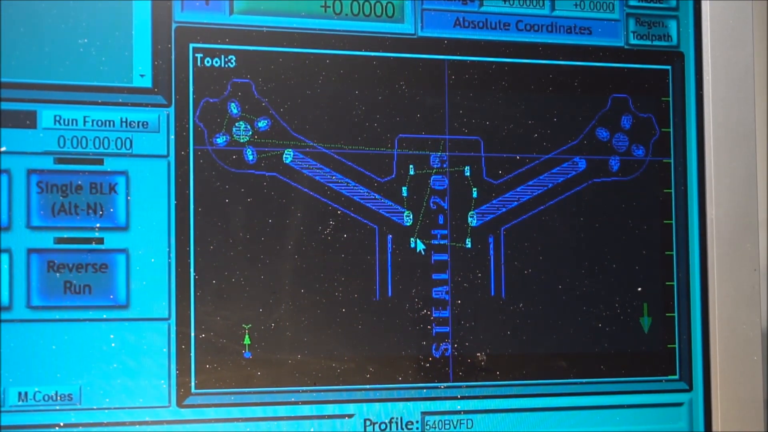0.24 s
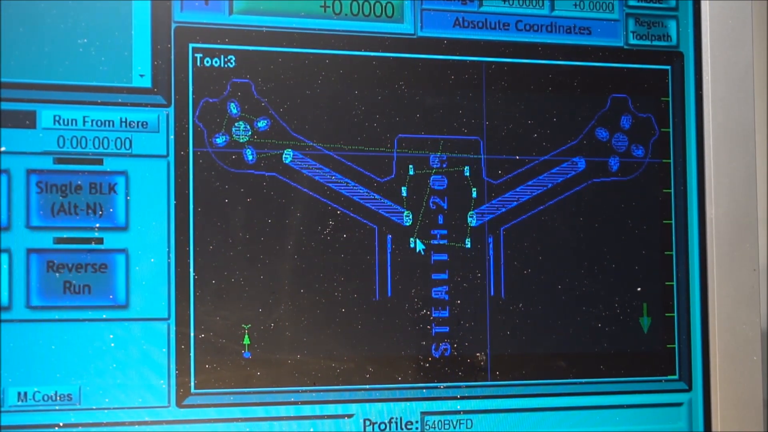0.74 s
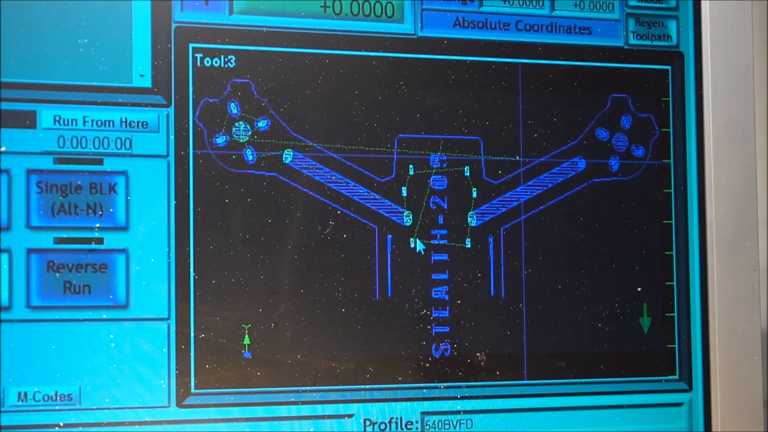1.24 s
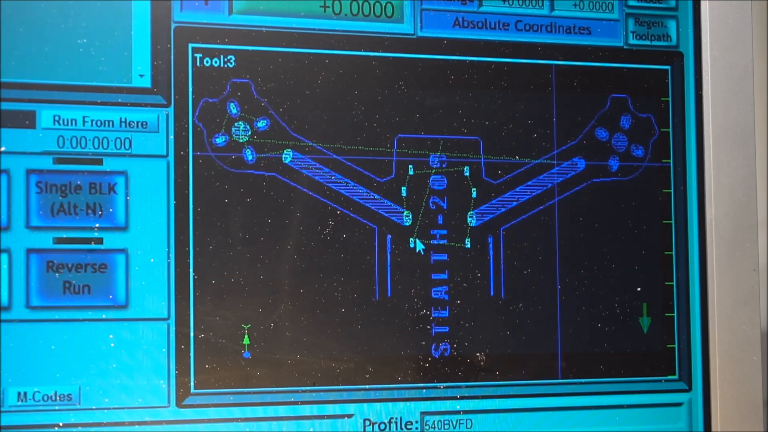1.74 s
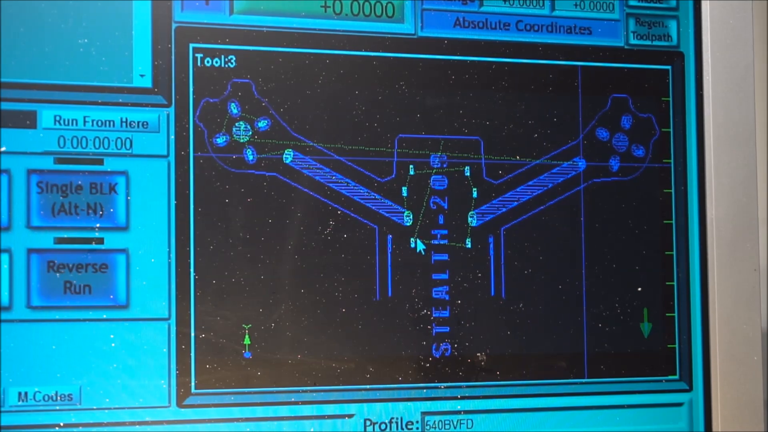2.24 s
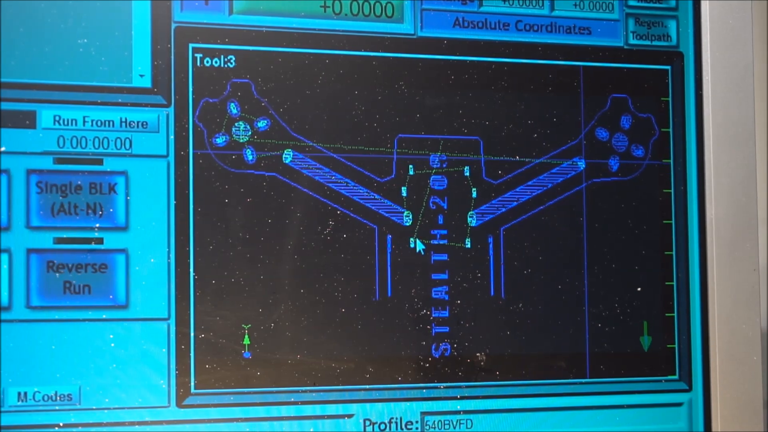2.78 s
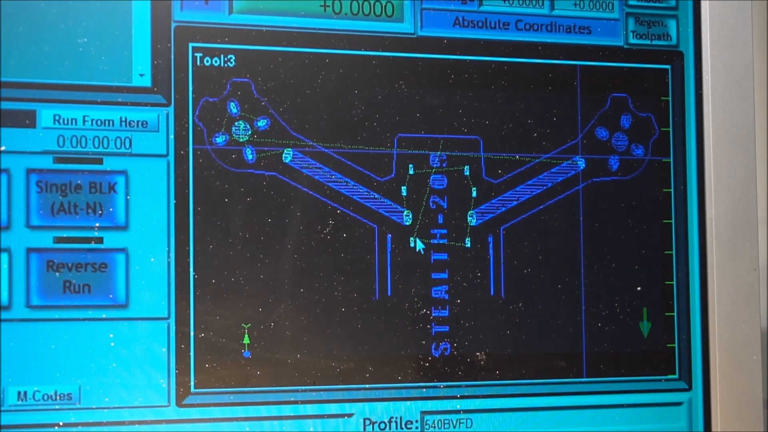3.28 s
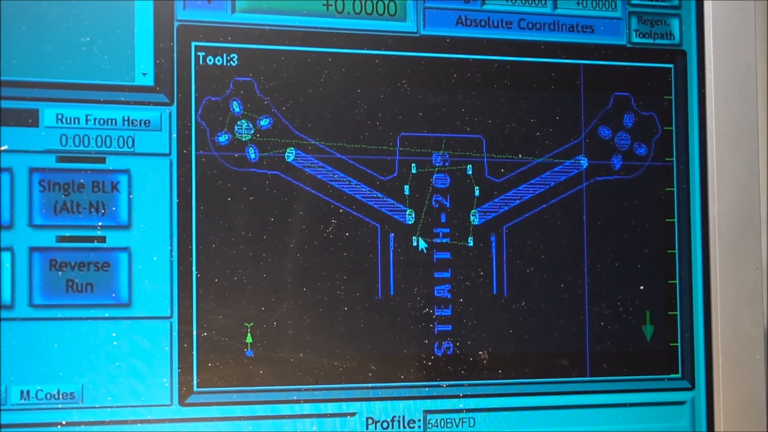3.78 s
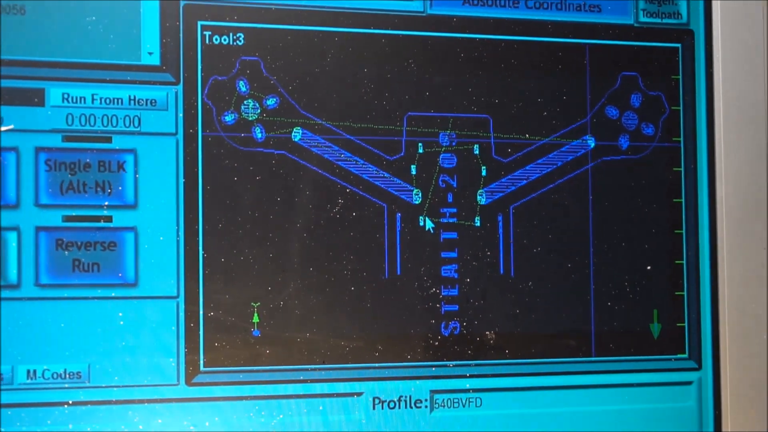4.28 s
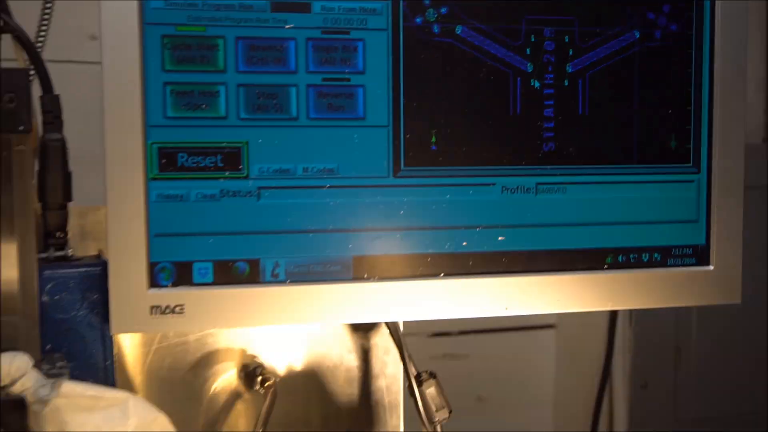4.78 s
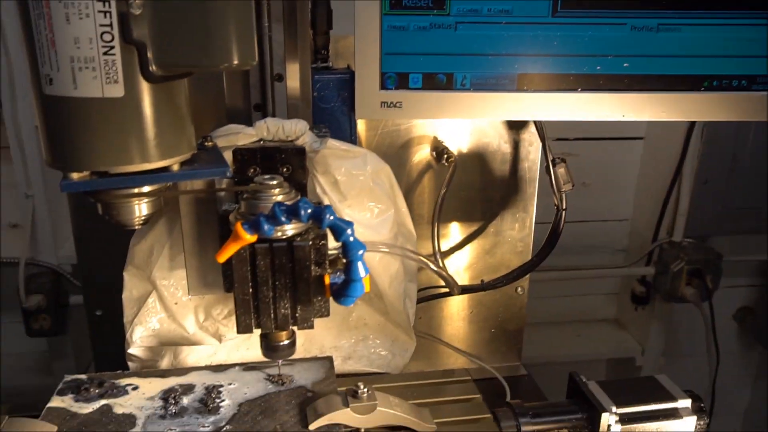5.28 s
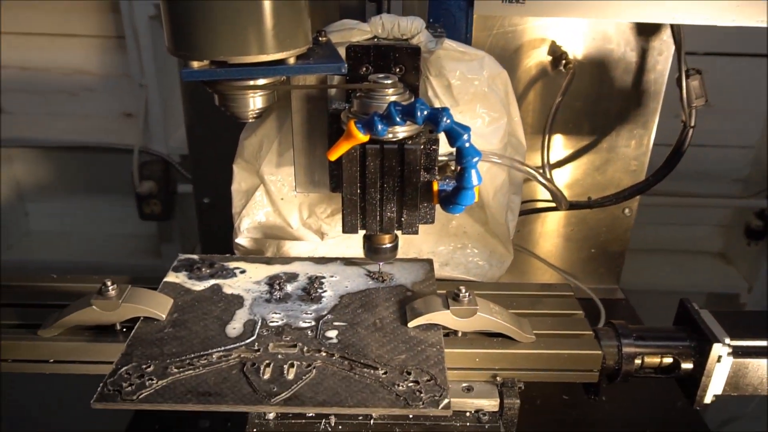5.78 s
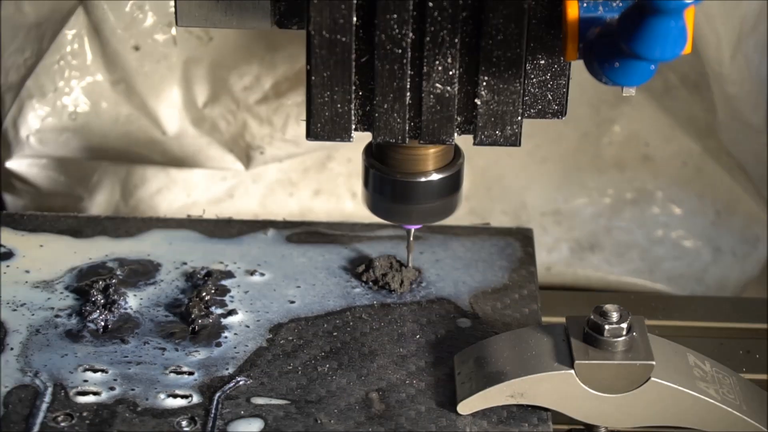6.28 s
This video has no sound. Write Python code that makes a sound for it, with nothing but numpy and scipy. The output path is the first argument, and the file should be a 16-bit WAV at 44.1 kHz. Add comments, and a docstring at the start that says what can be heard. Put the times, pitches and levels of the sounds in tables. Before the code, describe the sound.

A close handheld microphone hears a small mill running indoors: constant layered electric whine, a rush of air, and motor tones that change with the table's movement. Six dull handling thumps lead to five hard clacks. Then the cutter shrieks and chatters in two bursts of a little over half a second, with gritty scrapes and tiny high squeaks between. After a steady whining gap, a third bite starts with a shrill squeal and the sound ends sharply.

```python
"""At a small CNC mill: the spindle whines at about 237 turns a second, as steady lines over a noise of air and bearings.
The stepper motors sing, as other sets of lines, while the table feeds fast, then slowly.
The router bit bites three times into a carbon fibre plate: chatter is a harmonic series, squeals are short tones,
grit is grainy noise through the plate's resonances.
Close by, shaped noise bursts make six soft thumps and five sharp clacks, as of hands at the computer controls."""
import sys
import numpy as np
from scipy.fft import rfft, irfft, next_fast_len
from scipy.io import wavfile
from scipy.ndimage import uniform_filter1d, map_coordinates

SR = 44100
rng = np.random.default_rng(int(sys.argv[2]) if len(sys.argv) > 2 else 0)


def persist_wave(psi):
    """Save psi, clipped to +-1, as 16-bit WAV."""
    counts = np.round(np.clip(psi, -1, 1) * 32767).astype(np.int16)
    wavfile.write(sys.argv[1], SR, np.atleast_2d(counts).T)


N = 287958
TIME = np.arange(N) / SR
TURN_HZ = 237.4

# bites of the bit into the plate: start_s, end_s, rattle_delay_s, plate_chatter_db, bit_scream_db
BITES = [(2.339, 2.964, .14, -25.5, -22.5), (4.001, 4.635, 0.095, -22, -23),
         (5.882, 6.053, .01, -29.5, -19)]
BITE_S, RELEASE_S = 0.015, 0.027  # ramps as the bit enters and leaves the plate


def amp(db):
    """Decibels to gain."""
    return np.exp(np.asarray(db) * (np.log(10) / 20))


def unit(x):
    """Scale to rms 1."""
    return x / np.sqrt(np.mean(np.abs(x) ** 2) + 1e-20)


def along(points, hz):
    """Interpolate (Hz, value) points on a log frequency axis."""
    point_hz, values = np.transpose(points)
    return np.interp(np.log(hz + 1), np.log(point_hz + 1), values)


def wobble(knots_per_s):
    """Smooth random curve through normal knots."""
    knots = rng.standard_normal(int(N * knots_per_s / SR) + 4)
    coarse_s = TIME[::32]
    return np.interp(TIME, coarse_s, map_coordinates(knots, [coarse_s * knots_per_s]))


def filtered(x, response):
    """Apply a zero-phase response, a function of Hz, by FFT."""
    size = next_fast_len(N + SR // 4, True)
    spectrum = rfft(x, size) * response(np.fft.rfftfreq(size, 1 / SR))
    return irfft(spectrum, size)[..., :N]


def colour(points):
    """Response that follows (Hz, dB) points."""
    return lambda f: amp(along(points, f))


def body(modes):
    """Magnitude response of (Hz, width Hz, dB) resonances, summed in power."""
    def response(f):
        power = 0
        for mode_hz, width_hz, db in modes:
            damping = (f * width_hz) ** 2
            power = power + amp(db) ** 2 * damping / ((mode_hz ** 2 - f * f) ** 2 + damping + 1e-9)
        return np.sqrt(power)
    return response


def spread(hz):
    """Half the angle between the two sides: small in the bass, wide in the diffuse treble."""
    # left-right likeness: freq_hz, correlation
    likeness = [(1200, 1), (2500, 1), (5000, 0.66), (9000, 0.43), (14000, 0.18)]
    return np.arccos(np.clip(along(likeness, hz), -1, .999)) / 2


def noise(response):
    """Stereo noise of rms 1: alike in the bass, diffuse in the treble."""
    def mid_side(f):
        angle = spread(f)
        return response(f) * np.array([np.cos(angle), np.sin(angle)])
    mid, side = filtered(rng.standard_normal((2, N)), mid_side)
    return unit(np.array([mid + side, mid - side]))


def tone(hz, clock):
    """Stereo sine of rms 1; reflections put the sides out of step, more so in the treble."""
    lead = spread(hz) * rng.choice([-1, 1])
    phase = (2 * np.pi * ((hz * clock + rng.random()) % 1)).astype(np.float32)
    return np.sqrt(2) * np.sin(phase + np.float32([[lead], [-lead]]))


def swell(centre_s, half_width_s):
    """Gaussian bump, down to exp(-2) at the half width."""
    return np.exp(-2 * np.minimum(((TIME - centre_s) / half_width_s) ** 2, 20))


def held(start_s, end_s, attack_s, release_s):
    """Attack, hold and release, the ramps centred on start and end."""
    ramps = np.minimum((TIME - start_s) / attack_s, (end_s - TIME) / release_s)
    return np.clip(ramps + .5, 0, 1)


def grit(depth, grain_db):
    """Envelope of fine grains: a surge on each spindle turn, in grains of random size."""
    surge = 1 + depth * np.cos(2 * np.pi * TURN_HZ * TIME)
    return unit(surge * amp(grain_db * wobble(700)))


def whine(lines, drift, waver_db, flutter_db):
    """Lines on one slightly unsteady shaft; each wavers by itself, the short waves more."""
    clock = TIME + np.cumsum(drift * wobble(9)) / SR
    out = 0
    for hz, db in lines:
        sway_db = (hz / 1000) ** 0.38 * (waver_db * wobble(3.3) + flutter_db * wobble(24))
        out = out + amp(db + sway_db) * tone(hz, clock)
    return out


def spindle():
    """Steady lines of the spindle, bearings and drive, plus a whistling twelfth order."""
    # freq_hz, relative_db
    spindle_lines = [(234.2, -49.9), (480.1, -33.2), (542.6, -40.6), (722.0, -41.5), (751.0, -40.5),
                     (812.9, -44.6), (960.2, -30.8), (1084.7, -47.0), (1232.8, -40.1), (1440.0, -38.6),
                     (1687.7, -42.4), (2034.9, -47.5), (2172.2, -45.5), (2401.0, -50.4), (2893.5, -48.7),
                     (3329.6, -45.5), (3391.5, -47.2), (3601.4, -48.3), (3644.5, -47.6), (3663.3, -49.8),
                     (3797.9, -47.8), (3841.0, -45.8), (4069.8, -48.7), (4303.9, -50.6), (5698.2, -49.3),
                     (6648.4, -50.9), (7127.5, -51.5), (7609.3, -50.2), (7883.8, -51.0), (8422.2, -51.4),
                     (11967.1, -53.9), (12335.8, -54.8), (14093.5, -53.7)]
    lines = amp(-1) * whine(spindle_lines, drift=.0003, waver_db=1.2, flutter_db=1.48)
    whistle_db, late_whistle_db = -42, -42.5
    # louder from 4.6 s to 5.75 s
    late = held(4.62, 5.75, attack_s=0.052, release_s=0.052)
    whistle_level = amp(whistle_db) + amp(late_whistle_db) * late
    return lines + whistle_level * amp(0.6 * wobble(18)) * tone(12 * TURN_HZ, TIME)


def steppers():
    """Stepper lines change with the feed; the table rings with the fast feed, more as it eases."""
    # freq_hz, relative_db
    fast_lines = [(285.3, -52.1), (726.7, -32.1), (1048.1, -34.6), (1205.9, -41.3), (1251.6, -47.8),
                  (1453.5, -39.2), (1528.9, -48.4), (1773.8, -38.7), (2578.6, -49.1), (4314.7, -45.8)]
    # freq_hz, relative_db
    slow_lines = [(783.3, -41.5), (1491.2, -46.5), (1569.2, -40.5), (1921.8, -47.5), (3138.5, -48),
                  (6282.3, -57), (7843.5, -54.5), (9401.9, -54.6)]
    # moves on the slow feed: start_s, end_s, gain_db
    slow_moves = [(2.975, 3.46, -1), (4.62, 5.375, -1)]
    ramp_s = 0.052

    fast_db, ease_start_s, fast_stop_s, ease_db_per_s = 0.5, 1.22, 2.13, 6
    easing_s = np.clip(TIME - ease_start_s, 0, 1)
    # on from the outset
    fast_level = amp(fast_db - ease_db_per_s * easing_s) * held(-1, fast_stop_s, ramp_s, ramp_s)
    fast = fast_level * whine(fast_lines, drift=0.00022, waver_db=.5, flutter_db=0.5)

    slow_level = sum(amp(db) * held(start_s, end_s, ramp_s, ramp_s) for start_s, end_s, db in slow_moves)
    slow = slow_level * whine(slow_lines, drift=0.00022, waver_db=2.5, flutter_db=3.5)

    table_hz, ring_db, growth_start_s, growth_db_per_s, ring_stop_s = 2084.4, -38, 1.0, 9.5, 2.1
    growing_s = np.clip(TIME - growth_start_s, 0, 1)
    ring_level = amp(ring_db + growth_db_per_s * growing_s) * held(-1, ring_stop_s, ramp_s, ramp_s)
    ring = ring_level * amp(.7 * wobble(14)) * tone(table_hz, TIME)
    return fast + slow + ring


def bite_levels():
    """Levels of plate and bit: in each bite the bit screams first, then the plate joins in."""
    entry_db, entry_s = 2, 0.036  # the bit screams harder as it enters
    takeover_db, takeover_s = 3, .06  # and gives way as the plate takes up the vibration
    build_s = 0.027
    plate, bit = 0, 0
    for start_s, end_s, delay_s, plate_db, bit_db in BITES:
        rattle_s = start_s + delay_s
        shape_db = entry_db * swell(start_s, entry_s) - takeover_db * swell(rattle_s, takeover_s)
        plate = plate + amp(plate_db) * held(rattle_s, end_s, build_s, RELEASE_S)
        bit = bit + amp(bit_db + shape_db) * held(start_s, end_s, BITE_S, RELEASE_S)
    load = amp(1.2 * wobble(14))  # uneven load
    return plate * load, bit * load


def chatter(drift, jitter, flicker_db, runout):
    """The loaded bit rattles against the plate; low multiples shake the plate, high ones the bit."""
    # multiple of chatter_hz, relative_db
    partials = [(1, 0.5), (2, -2.5), (3, -0.5), (4, -12.5), (5, -5), (6, -2.5), (7, -10.5), (9, -10),
                (11, -2.5), (12, -4), (13, -5), (14, -9.5), (16, -10.5), (17, -21.5), (19, -15.5)]
    # resonances of bit and collet: freq_hz, width_hz, relative_db
    bit_modes = [(2876, 61, -5), (6490, 160, -4.5), (8890, 320, 1), (9110, 340, -9.5), (9570, 260, -6),
                 (11700, 260, -8.5), (12800, 350, -6.5), (13600, 400, -13)]
    chatter_hz = 727.6
    plate_level, bit_level = bite_levels()
    clock = TIME + np.cumsum(drift * wobble(20) + jitter * wobble(350)) / SR
    plate, bit = np.zeros((2, N)), np.zeros((2, N))
    for k, db in partials:
        # the rattle saturates: partials only dip, the lowest least
        level = amp(db - flicker_db * k / (k + 1) * np.abs(wobble(45)))
        # each partial slips in and out of step with the bit
        slip_s = 0.033 * wobble(80) / (np.sqrt(k) * chatter_hz)
        partial = level * tone(k * chatter_hz, clock + slip_s)
        if k < 8:
            plate = plate + partial
        else:
            bit = bit + partial
    # the off-centre bit digs deeper once a turn
    rattle = plate_level * unit(plate) * grit(depth=runout, grain_db=1.8)
    scream = amp(-4.0) * unit(bit) * amp(1.1 * wobble(500))
    dust = amp(-3.5) * noise(body(bit_modes)) * amp(1.9 * wobble(700) + wobble(50))
    return rattle + bit_level * (scream + dust)


def scrapes():
    """Breaking fibres ring the plate in clumps, throughout each bite, as the bit leaves, and apart."""
    # plate resonances before sharpening: freq_hz, width_hz, relative_db
    plate_modes = [(742, 44, 1), (1026, 160, 0.5), (1210, 121, -3), (1480, 110, -5.5), (1700, 92, -25),
                   (2257, 300, 0), (3700, 500, -12)]
    # separate rough scrapes: centre_s, half_width_s, low_modes_db, high_modes_db
    lone_scrapes = [(2.3, 0.078, -32.5, -33.5), (3.51, 0.13, -33, -35), (3.966, 0.11, -32.5, -34.5),
                    (4.12, 0.027, -22.5, -32), (5.359, 0.058, -30.5, -36)]
    split_hz = 1900
    drive = noise(np.ones_like) * grit(depth=.45, grain_db=0.5) * amp(wobble(70))

    def plate(f):
        sharpened = body(plate_modes)(f) ** 1.48
        return sharpened * f ** 4 / (f ** 4 + 600 ** 4)

    low = unit(filtered(drive, lambda f: plate(f) * (f < split_hz)))
    high = unit(filtered(drive, lambda f: plate(f) * (f >= split_hz)))
    cutting = sum(held(start_s, end_s, BITE_S, RELEASE_S) for start_s, end_s, *_ in BITES)
    leaving = sum(swell(end_s, .04) for _, end_s, *_ in BITES)
    out = cutting * (amp(-35.5) * low + amp(-36.5) * high) + amp(-30.5) * leaving * high
    for centre_s, half_width_s, low_db, high_db in lone_scrapes:
        out = out + swell(centre_s, half_width_s) * (amp(low_db) * low + amp(high_db) * high)
    return out


def squeals():
    """The bit rubs the wall of its slot and rings, over a spit of dust."""
    # centre_s, half_width_s, pitch_hz, tone_db, dust_db
    rubs = [(0.967, .02, 2940, -32, -57.5), (1.086, .018, 2920, -31, -52.5),
            (2.387, 0.066, 2920, -32, -48.5), (3.115, 0.017, 7600, -28, -27), (3.203, .025, 7600, -35, -30),
            (3.54, 0.022, 7640, -28.5, -28), (4.008, .08, 7640, -32.5, -45.5),
            (5.944, 0.031, 8030, -14.5, -24.5)]
    # freq_hz, relative_db_per_hz
    dust_spectrum = [(2000, -22), (7000, -4.5), (12000, -2), (15000, -12)]
    clock = TIME + np.cumsum(.004 * wobble(300)) / SR
    dust = noise(colour(dust_spectrum)) * grit(depth=.3, grain_db=-0.5)
    out = 0
    for centre_s, half_width_s, hz, tone_db, dust_db in rubs:
        sound = amp(tone_db) * tone(hz, clock) + amp(dust_db) * dust
        out = out + swell(centre_s, half_width_s) * sound
    return out


def blow(start_s, t60_s, attack_s):
    """Envelope of a contact: fast rise, exponential decay."""
    age_s = np.clip(TIME - start_s, 0, 1)
    return (1 - np.exp(-age_s / attack_s)) * amp(-60 * age_s / t60_s)


def thumps():
    """Soft contacts: decaying bursts of low noise."""
    # start_s, level_db, t60_s
    contacts = [(.412, -38.5, 0.12), (.578, -26, 0.069), (.79, -34, .12), (.966, -27, 0.12),
                (1.167, -32.5, 0.18), (1.366, -23, 0.19)]
    # freq_hz, relative_db_per_hz
    thud_spectrum = [(30, -33.5), (70, -18.5), (110, -7), (145, -3.5), (200, -17.5), (300, -12), (600, -58)]
    level = sum(amp(db) * blow(start_s, t60_s, attack_s=0.0049) for start_s, db, t60_s in contacts)
    return noise(colour(thud_spectrum)) * level


def clacks():
    """Sharp contacts: a plastic ring, a hollow knock and a bright snap decay together."""
    # start_s, ring_db, knock_db, snap_db, t60_s
    contacts = [(1.565, -15.5, -36.5, -28, .14), (1.636, -15.5, -33, -17.5, 0.12),
                (2.023, -22.5, -23.5, -18, .13), (2.077, -23, -25.5, -23, .12),
                (2.155, -11.5, -25.5, -19.5, 0.14)]
    # freq_hz, relative_db_per_hz
    ring_spectrum = [(300, -19), (1100, -13.5), (1600, -0.5), (2200, -9), (2800, -4), (5000, -7.5),
                     (6500, -20), (15000, -31.5)]
    # resonances before sharpening: freq_hz, width_hz, relative_db
    knock_modes = [(278, 89, -7), (611, 130, 1)]
    # freq_hz, relative_db_per_hz
    snap_spectrum = [(1500, -28.5), (4500, -11), (7000, 0), (10000, -2), (15000, -7)]
    knock = noise(lambda f: body(knock_modes)(f) ** 1.8)
    snap = noise(colour(snap_spectrum))
    out = 0
    for start_s, ring_db, knock_db, snap_db, t60_s in contacts:
        # every contact favours other modes of the plastic
        modes_db = 4.5 * rng.standard_normal(200)
        modes_hz = np.linspace(0, SR / 2, len(modes_db))
        ring = noise(lambda f: colour(ring_spectrum)(f) * amp(np.interp(f, modes_hz, modes_db)))
        sound = amp(ring_db) * ring + amp(knock_db) * knock + amp(snap_db) * snap
        out = out + blow(start_s, t60_s, attack_s=0.0013) * sound
    return out


def air():
    """Air and bearing noise: low rush, slowly rising hiss, faint high orders of the spindle."""
    # freq_hz, relative_db_per_hz
    air_spectrum = [(30, -36.5), (70, -31), (130, -12.5), (400, -8), (680, -9.5), (900, -1), (1300, -1),
                    (2600, -4.5), (3700, -1), (4800, -5), (8200, -8.5), (9500, -5), (11000, -12),
                    (14300, -12), (15700, -14)]
    rush_db, hiss_db, hiss_db_per_s, orders_db = -31, -31, 0.3259, -5.0
    shape = colour(air_spectrum)

    def low(f):
        return 1 / np.sqrt(1 + (f / 4800) ** 8)

    def comb(f):
        # narrow teeth at multiples of the turn rate
        offset_hz = TURN_HZ * np.sin(np.pi * f / TURN_HZ) / np.pi
        return np.exp(-(offset_hz / 5) ** 2) * (f > 2000)

    rush = noise(lambda f: shape(f) * low(f)) * grit(depth=0.069, grain_db=1.86) * amp(0.7 * wobble(25))
    hiss = noise(lambda f: shape(f) * np.sqrt(1 - low(f) ** 2)) * amp(0.83 * wobble(500))
    orders = noise(lambda f: comb(f) * shape(f) ** 0.46)
    return amp(rush_db) * rush + amp(hiss_db + hiss_db_per_s * TIME) * (hiss + amp(orders_db) * orders)


def scene():
    """Treble comes a little from the left, until the microphone turns to face the machine."""
    # freq_hz, left_minus_right_db
    balance = [(1400, 0), (3000, 2.4)]
    cutting = chatter(drift=.003, jitter=.005, flicker_db=13.5, runout=0.16) + scrapes() + squeals()
    sources = spindle() + steppers() + cutting + thumps() + clacks() + air()
    from_left = filtered(sources, lambda f: amp(along(balance, f) * np.array([[.5], [-.5]])))
    # facing: narrower and slightly louder
    mid = sources.mean(axis=0)
    ahead = amp(1) * (mid + amp(-3) * (sources - mid))
    midpoint_s, turning_s = 5.2, 1
    facing = np.clip((TIME - midpoint_s) / turning_s + .5, 0, 1)
    return (1 - facing) * from_left + facing * ahead


def limiter(x):
    """Short-term level above the ceiling cuts the gain at once; it recovers at a steady dB rate."""
    ceiling_db, recover_db_per_s = -16, 19
    power = np.abs(uniform_filter1d(np.mean(x ** 2, axis=0), size=441))  # 10 ms mean
    over_db = np.maximum(10 * np.log10(power + 1e-12) - ceiling_db, 0)
    recovery_db = recover_db_per_s * TIME
    return x * amp(recovery_db - np.maximum.accumulate(over_db + recovery_db))


def record(dry):
    """Limiter, abrupt end, gentle bass cut and steep treble limit."""
    stop_s, top_hz = 5.973, 15800
    ending = np.clip((stop_s - TIME) / .004 + .5, 0, 1)
    return filtered(limiter(dry) * ending, lambda f: (f < top_hz) * f / np.hypot(f, 55))


dry = scene()
out = record(dry)
persist_wave(out)
```